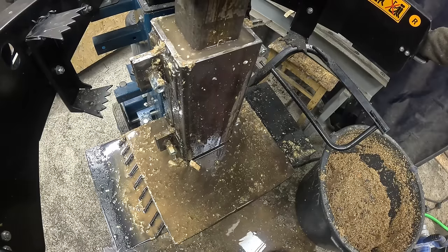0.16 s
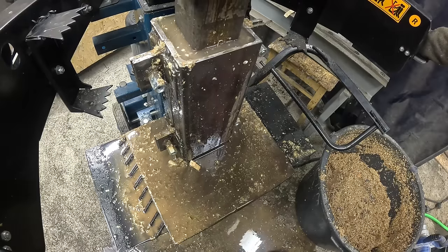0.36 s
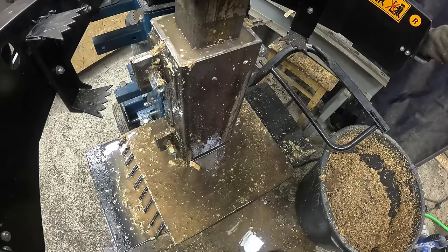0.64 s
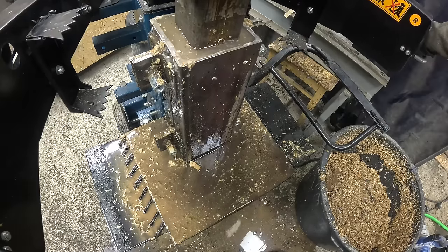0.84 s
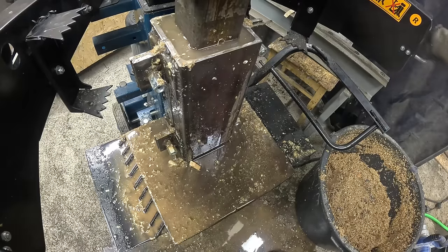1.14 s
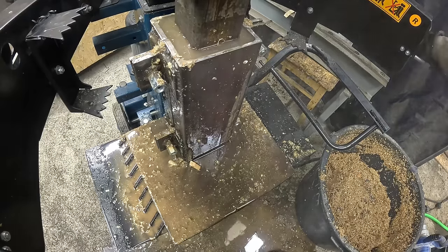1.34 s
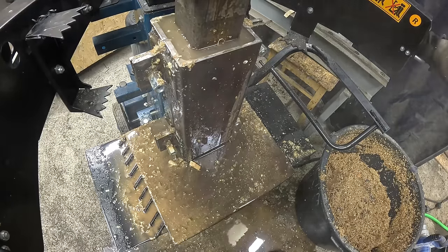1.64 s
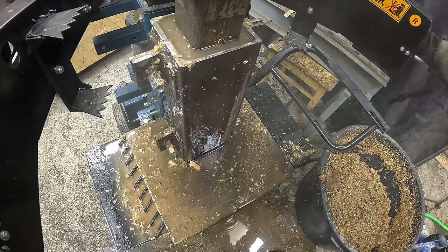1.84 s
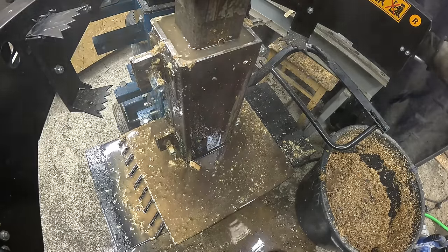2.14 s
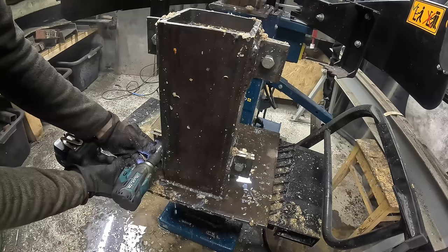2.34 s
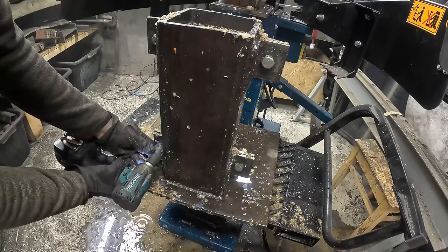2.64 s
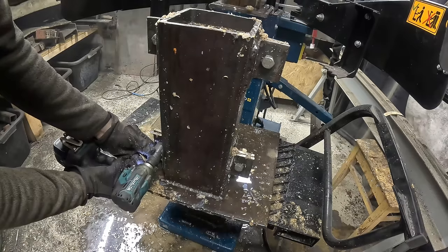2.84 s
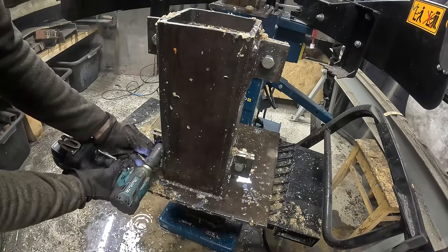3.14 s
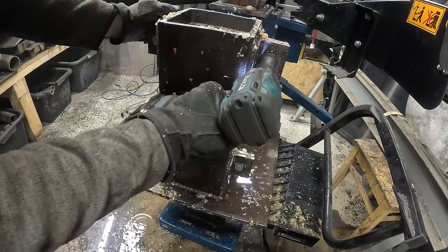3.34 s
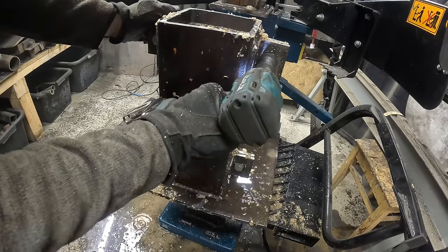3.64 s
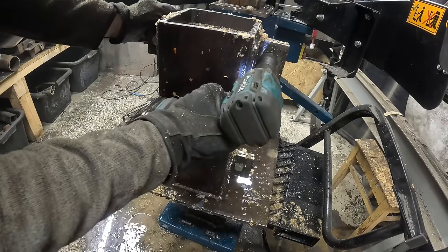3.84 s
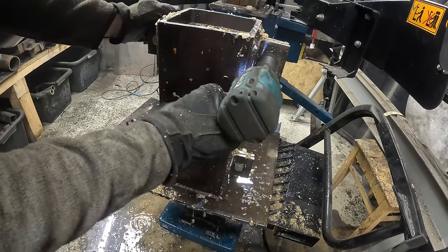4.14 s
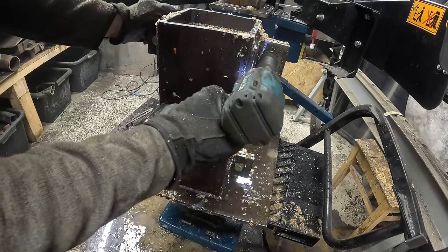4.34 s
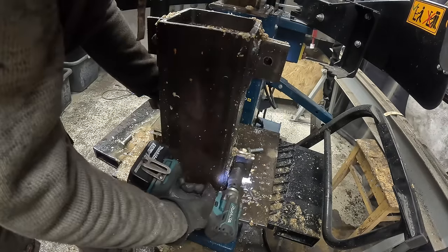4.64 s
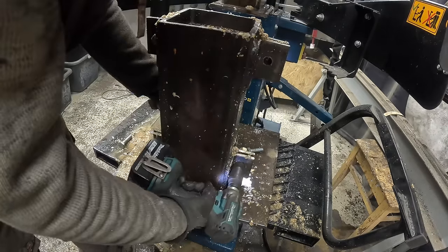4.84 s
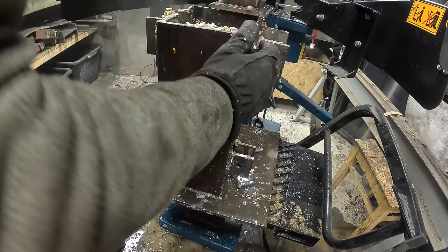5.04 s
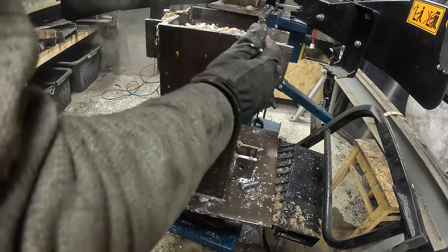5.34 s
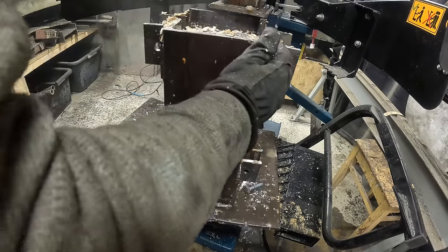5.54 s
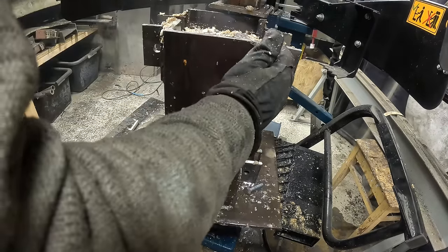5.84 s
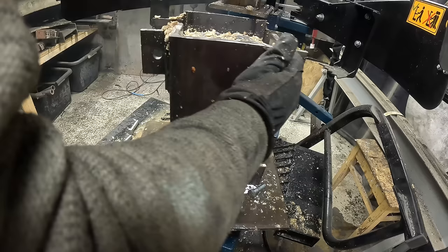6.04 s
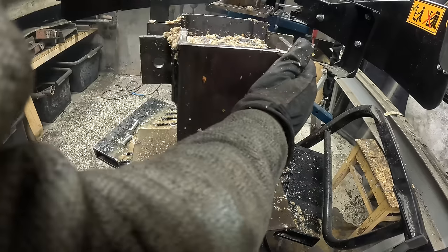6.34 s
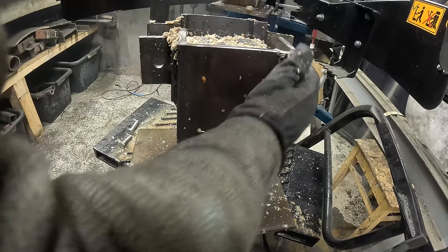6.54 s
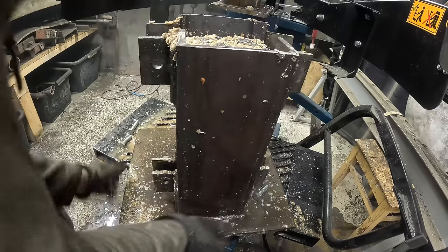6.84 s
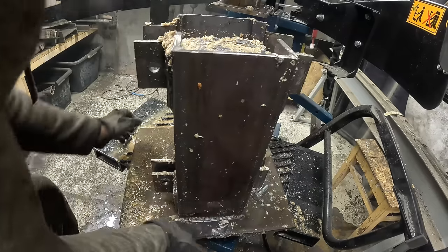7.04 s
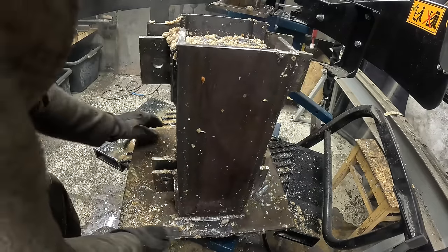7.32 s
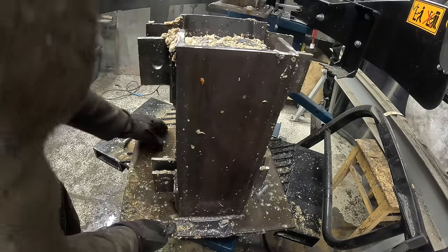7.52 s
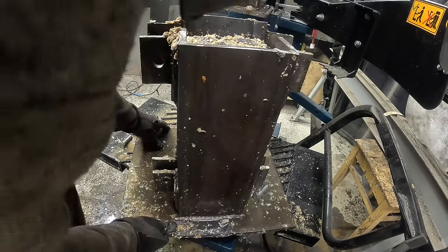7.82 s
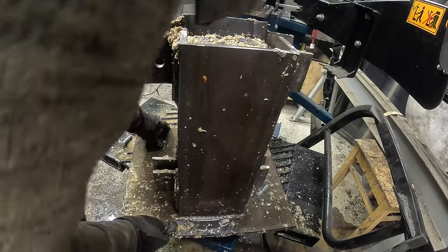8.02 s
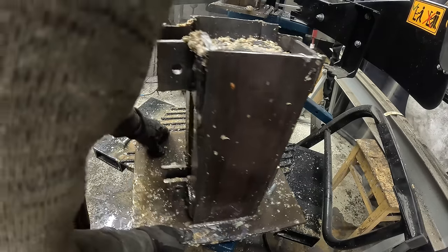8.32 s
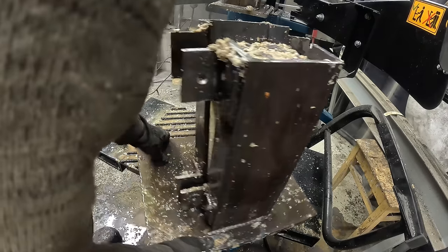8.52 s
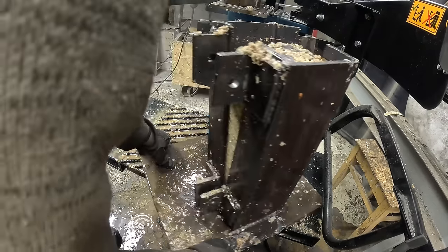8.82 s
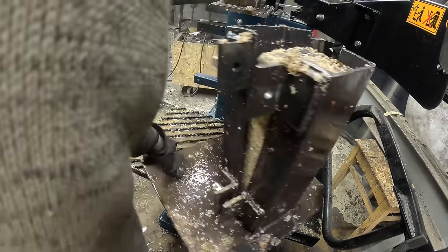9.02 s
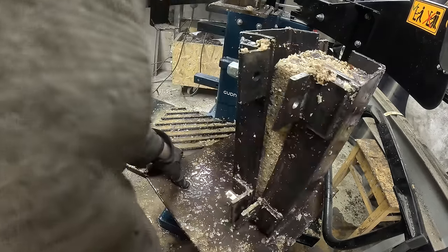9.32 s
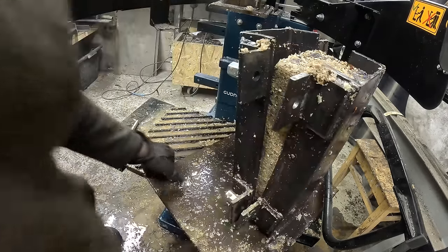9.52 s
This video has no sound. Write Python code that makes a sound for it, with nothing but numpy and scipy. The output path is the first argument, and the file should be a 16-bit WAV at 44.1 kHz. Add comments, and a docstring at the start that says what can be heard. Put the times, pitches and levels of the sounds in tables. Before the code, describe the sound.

Labouring hydraulic whine and oil hiss stop abruptly, then close impact wrench clatter in three bursts, loose bolt rattling, and a steel mould dragged open with clanks.

```python
"""In a workshop a hydraulic pump labours, runs free and stops; load slows its shaft orders and pulsing oil hiss.
A cordless impact wrench then undoes the bolts of a steel mould in three bursts, close to the microphone:
modal blows of its hammer over a motor whose whine follows the trigger. A loose bolt is rattled out by hand
and put down, and the mould is rocked open on a steel table: noise-burst knocks and dragging ring steel modes.
Sleeves rustle, arms bump the table, and a faint air noise lies underneath."""
import sys
import numpy as np
from scipy import signal
from scipy.fft import rfft, irfft
from scipy.io import wavfile
from scipy.ndimage import uniform_filter1d

SR = 44100
rng = np.random.default_rng(int(sys.argv[2]) if len(sys.argv) > 2 else 0)


def generate_wav(signal):
    """Clip the signal to [-1, 1] and save it as 16-bit WAV at the path in sys.argv[1]."""
    frames = np.transpose(np.atleast_2d(signal))
    scaled = np.clip(frames, -1, 1) * 32767
    pcm = np.round(scaled).astype(np.int16)
    wavfile.write(sys.argv[1], SR, pcm)


N = 426432
TIME = np.arange(N) / SR
IDLE_HZ, SLIP_HZ = 49.737, .57  # pump shaft running free; its slowing under full load
STRIKE_RISE_S = .0002  # onset of a hammer blow
WRENCH_END = 5.096  # s; the wrench and its room tail stop here

# bright modes of the bolt itself: [f/Hz, level/dB, t60/s]
BOLT_MODES = [(1690, 14.5, .08), (2370, -1.5, 0.09), (2990, -3.5, .1), (4100, 1, .14), (4210, -10.5, .16),
              (5060, -10, 0.12), (5480, -9, 0.16)]
# trigger pulls: [pressed t/s, full speed t/s, eased off t/s, braked t/s, loaded level/dB, free peak level/dB,
# fade/dB per s, gear whine relative level/dB, case whirr relative level/dB]
TRIGGER_PULLS = [(2.326, 3.018, 3.11, 3.235, -38.5, -32.5, 70, -13, -5),
                 (3.346, 4.19, 4.29, 4.448, -38.5, -29, 30, -4.5, -13),
                 (4.6, 4.799, 4.97, 5.092, -31.5, -30.5, 70, -16.5, -10)]


def gain_of(db):
    """Decibels to amplitude."""
    return 10 ** (np.asarray(db) / 20)


def evened(x):
    """Scales to rms 1."""
    return x / np.sqrt(np.mean(x ** 2) + 1e-20)


def read(points, hz):
    """Reads a spectrum on a log-frequency axis."""
    f, value = np.transpose(points)
    return np.interp(np.log(hz + 1), np.log(f + 1), value)


def curves(rows):
    """Every column of a table of times, sample by sample."""
    s, *columns = np.transpose(rows)
    return [np.interp(TIME, s, c) for c in columns]


def between(start, end):
    """A switch with 3 ms edges."""
    return np.clip(np.minimum(TIME - start, end - TIME) / .003, 0, 1)


def stroke(start, end, attack_s, release_db_per_s, sag_db_per_s=0):
    """Envelope of a movement: attack, a hold that may sag or grow, release."""
    t = np.maximum(TIME - start, 0)
    release_db = -abs(release_db_per_s) * np.maximum(TIME - end, 0)
    return np.minimum(t / attack_s, 1) * gain_of(-sag_db_per_s * t + release_db)


def add(mix, s, sound):
    """Mixes a sound in at s seconds."""
    part = mix[round(s * SR):][:len(sound)]
    part += sound[:len(part)]


def drift(rate_hz):
    """Slow random wander of rms 1, with a new target rate_hz times a second."""
    knots = rng.standard_normal(4000)
    return evened(np.interp(TIME * rate_hz, np.arange(len(knots)), knots))


def colour(x, *spectra, size=4096):
    """Causal minimum-phase filter whose gain is the sum of the spectra in dB."""
    hz = abs(np.fft.fftfreq(size, 1 / SR))
    db = np.maximum(sum(read(s, hz) for s in spectra), -100)
    log_gain = np.log(gain_of(db))
    taps = np.fft.ifft(np.exp(np.conj(signal.hilbert(log_gain)))).real
    return signal.oaconvolve(x, taps[:size // 2])[:len(x)]


def noise(spectrum):
    """Coloured noise of rms 1."""
    return evened(colour(rng.standard_normal(N), spectrum))


def band(hz, octaves, db):
    """A peak of db at hz, as a spectrum."""
    return [(hz / 2 ** octaves, 0), (hz, db), (hz * 2 ** octaves, 0)]


def cycle(turns, orders, db, size=8192):
    """A wave that repeats once a turn, with these orders at these rms levels."""
    bins = np.zeros(size // 2 + 1, complex)
    phases = np.exp(2j * np.pi * rng.random(len(orders)))
    bins[np.asarray(orders, int)] = gain_of(db) * phases
    wave = irfft(bins) * size / np.sqrt(2)
    return np.interp(turns % 1 * size, np.arange(size), wave, period=size)


def ringing(modes, pitch=1, spread_db=3, detune=.012):
    """Steel's answer to one click, of energy 1; chance weights and detunes the decaying modes."""
    t = np.arange(SR // 2) / SR
    hz, db, t60 = np.transpose(modes)[:, :, None]
    weight = gain_of(db + spread_db * rng.standard_normal(db.shape)) / np.sqrt(t60)
    hz = hz * pitch * (1 + detune * rng.standard_normal(hz.shape))
    decay = np.exp(-np.log(1000) * t / t60)
    ring = (weight * decay * np.cos(2 * np.pi * hz * t)).sum(0)
    return ring / np.linalg.norm(ring)


def workshop(x, left_db, wet_db, likeness, lag_s):
    """Direct sound and a tail that dies by band, at two close microphone ports."""
    # decay of the room: [f/Hz, t60/s]
    room_t60 = [(100, 0.43), (300, 0.47), (1000, 0.47), (2000, 0.48), (5000, 0.32), (12000, 0.17)]
    taps = rng.standard_normal((2, SR)) * (rng.random((2, SR)) < 4000 / SR) * (TIME[:SR] > .004)
    hz, t, z = signal.stft(taps, SR, nperseg=256)
    # how far the two tails differ by frequency
    unlike = read([(70, 0.68), (280, .08), (1000, 0.43), (2800, 1.2), (6500, 0.57), (12000, 0.85)], hz)
    same = np.clip(1 - (1 - likeness) * unlike, -1, 1)[:, None]
    z[1] = same * z[0] + np.sqrt(1 - same ** 2) * z[1]
    decay = gain_of(-60 * t / read(room_t60, hz)[:, None])
    tail = signal.istft(z * decay, SR, nperseg=256)[1]
    wet = signal.fftconvolve(x[None], tail / np.linalg.norm(tail[0]), axes=1)[:, :N]
    k = np.arange(-8, 9)
    late = np.convolve(x, np.sinc(k - lag_s * SR) * np.hanning(len(k)), "same")  # left is a little farther
    return (np.array([late, x]) + gain_of(wet_db) * wet) * gain_of([[left_db / 2], [-left_db / 2]])


def quiet_air(level_db=-64.0):
    """The faint steady noise of the place, as coloured noise."""
    return gain_of(level_db) * noise([(30, -14.5), (150, -6.0), (500, -11.5), (1100, -8.5), (1700, -6.5),
                                      (4000, -29.5), (9000, -23.0), (12000, -44.5)])


def pump_state(turns, strong, oil, oil_db, buzz_db, whine_db, pulsing, count=260):
    """Gear teeth give strong shaft orders over a fine buzz; the oil hiss pulses with the shaft."""
    orders, db = np.transpose(strong)
    weak = np.setdiff1d(np.arange(3, count), orders)
    weak_db = read(oil, weak * IDLE_HZ) + 4 * rng.standard_normal(len(weak))
    buzz = evened(cycle(turns, weak, weak_db))
    # three groups of orders waver separately
    whine = sum(cycle(turns, orders[k::3], db[k::3]) * gain_of(1.2 * drift(22)) for k in range(3))
    pulse = 1 + pulsing * np.cos(2 * np.pi * turns)
    hiss = noise(oil) * pulse * gain_of(0.58 * drift(24.63))
    return np.array([gain_of(oil_db) * hiss + gain_of(buzz_db) * buzz, gain_of(whine_db) * whine])


def pump(end=2.321, drone_db=-29.5, drone_power=10):
    """Load slows the shaft and makes the frame drone at twice its speed. Gives rush and tones."""
    # pump drive: [t/s, load 0-1, relative level/dB]
    drive = [(0, 1, 0), (.38, 1, 0), (.48, .92, -2.5), (.57, .7, -2.5), (.63, .35, -2), (.69, 0, -1.5),
             (.85, 0, -1.5), (1.2, 0, -.5), (1.68, 0, .5), (2.32, 0, 0)]
    # strong shaft orders, under load and running free: [multiple of shaft speed, relative level/dB]
    loaded_orders = [(1, -39), (10, -30), (12, -22.5), (13, -35), (15, -37), (22, -37), (24, -37),
                     (28, -43), (29, -43), (36, -41), (38, -28.5), (47, -42), (48, -44), (59, -41),
                     (61, -44), (84, -47), (106, -50), (109, -48), (120, -47), (123, -50), (130, -49),
                     (133, -48), (145, -49), (156, -49), (159, -43), (168, -43), (169, -45), (227, -58),
                     (229, -57), (260, -65)]
    free_orders = [(1, -40), (14, -48), (23, -45), (27, -44), (30, -43), (37, -39), (38, -45), (47, -46),
                   (49, -46), (60, -39), (82, -45), (83, -42), (99, -47), (100, -45), (108, -43),
                   (111, -46), (112, -43), (122, -47), (132, -44), (133, -39), (136, -49), (137, -50),
                   (142, -50), (143, -48), (146, -49), (152, -44), (156, -48), (157, -39), (158, -42),
                   (167, -51), (179, -51), (184, -55), (227, -55), (256, -63)]
    # oil rushing through the valve, under load and running free: [f/Hz, relative level/dB per Hz]
    loaded_oil = [(25, -14.5), (70, -3), (110, 6), (175, 1), (260, 4), (340, -5), (430, 6), (540, 10),
                  (800, -4), (1250, 1), (2050, -5.5), (2900, -5.5), (4000, -17), (6500, -9.5), (8500, -13),
                  (10500, -27), (15500, -33)]
    free_oil = [(15, -38), (25, -11), (53, -29.5), (75, -6.5), (178, -10), (482, -4.5), (848, -6),
                (1170, -1.5), (1750, -6.5), (1900, -6.5), (2060, -8), (3000, -3), (4500, -7), (7700, -8),
                (10000, -23.5), (12400, -22.5), (15500, -52)]
    load, db = curves(drive)
    load = np.clip(load, 0, 1)
    shaft_hz = IDLE_HZ - SLIP_HZ * np.sin(load * np.pi / 2)
    turns = np.cumsum(shaft_hz * (1 + .00012 * drift(12))) / SR
    loaded = pump_state(turns, loaded_orders, loaded_oil,
                        oil_db=-27.2, buzz_db=-32, whine_db=-1.5, pulsing=.35)
    free = pump_state(turns, free_orders, free_oil,
                      oil_db=-28.3, buzz_db=-33.5, whine_db=0, pulsing=0.22)
    rush, tones = load * loaded + np.sqrt(1 - load) * free
    drone = load ** drone_power * cycle(turns, [2], [drone_db])
    return np.array([rush, tones + drone]) * gain_of(db) * between(-1, end)


def valve(attack_s=0.025, release_db_per_s=160):
    """Short rushes of oil, as banded noise, while the pressure drains."""
    # oil surging through the valve as the lever is let go: [from t/s, to t/s, centre f/Hz, level/dB]
    surges = [(0.51, 0.658, 1350, -32), (0.606, 0.755, 330, -40.5), (0.727, 0.753, 1750, -32)]
    return sum(gain_of(db) * noise(band(hz, 4.4, 41)) * stroke(start, end, attack_s, release_db_per_s)
               for start, end, hz, db in surges)


def cloth(grains_per_s=2500, attack_s=0.012, release_db_per_s=167):
    """With each movement fabric and sawdust rustle in fine grains; hands bump softly on the table."""
    # movements of the arms: [from t/s, to t/s, sleeve rustle level/dB, soft bumping level/dB]
    moves = [(5.079, 5.27, -61, -68.5), (5.595, 6.553, -85, -53), (6.65, 6.835, -62.5, -57),
             (6.87, 6.96, -54, -57), (6.987, 7.024, -69, -49.5), (7.047, 7.19, -76, -53),
             (7.195, 7.244, -58, -64), (7.304, 7.417, -58.5, -57), (7.49, 7.518, -61.5, -69),
             (7.728, 7.755, -57, -48.5), (7.8, 7.876, -70, -52.5), (7.99, 8.01, -61, -73),
             (8.138, 9.1, -63.5, -41), (9.146, 9.314, -59, -51), (9.422, 9.533, -55.5, -61),
             (9.578, 9.67, -53.5, -67)]
    # rustle of the sleeves: [f/Hz, relative level/dB per Hz]
    rustle_colour = [(180, -46), (300, -5.5), (639, -2.5), (750, -1), (1550, 5.5), (1850, -2), (5000, -8),
                     (8500, -11), (10500, -21.5), (14000, -46)]
    # a hand or arm bumping the table: [f/Hz, relative level/dB per Hz]
    bump_colour = [(25, 1.5), (55, -1), (85, -3), (110, -1.5), (150, 0), (210, -3), (320, -10.5),
                   (600, -12), (1500, -35.5), (3000, -60)]
    grains = evened(rng.laplace(size=N) * (rng.random(N) < grains_per_s / SR))
    rustle = evened(colour(1.3 * grains + rng.standard_normal(N), rustle_colour))
    rustle = rustle * gain_of(3 * drift(70) + 2 * drift(18))
    bumps = noise(bump_colour)
    out = np.zeros(N)
    for start, end, rustle_db, bump_db in moves:
        movement = stroke(start, end, attack_s, release_db_per_s)
        out += movement * (gain_of(rustle_db) * rustle + gain_of(bump_db) * bumps)
    return out


def knock(contact, t60, rise_s, db, treble_db, bass_db, hollow_db, ring_hz,
          rebound_s=.015, rebound_db=-11, push_db=-6, place_peak_db=4, contact_spread=0.02):
    """A firm push, a short chatter of contacts and a rebound; each place struck has its own resonance."""
    t = np.arange(8000) / SR
    after = np.maximum(t - rebound_s * rng.uniform(0.62, 1.3), 0)
    first, rebound = (gain_of(-60 * u / t60) * (1 - np.exp(-u / rise_s)) for u in (t, after))
    chatter = rng.standard_normal(len(t)) * (first + gain_of(rebound_db) * rebound)
    force = chatter / np.linalg.norm(chatter)
    push = np.hanning(24)
    add(force, rise_s, gain_of(push_db) * push / push.sum())
    tilt = [(330, bass_db), (480, hollow_db), (620, hollow_db), (900, 0), (1700, 0), (3500, treble_db)]
    # the pitch varies with the place struck
    place = np.array(contact) * [np.exp(contact_spread * rng.standard_normal()), 1]
    sound = colour(force, place, tilt, band(ring_hz, 0.15, place_peak_db))
    return gain_of(db) * sound / np.sqrt(np.mean(sound[:700] ** 2))


def set_down(level_db=-9, contact_t60=0.065, rise_s=0.00206):
    """The loose bolt touches the table, lands and tips over, each contact a knock."""
    # contacts of the bolt: [t/s, relative level/dB, treble/dB, bass/dB, hollow/dB, ring f/Hz]
    contacts = [(7.344, -27, -8, 1.5, 13, 1100), (7.378, -37, 1, 16, 8, 950),
                (7.626, -10, -2, -8.5, 7, 1400), (7.68, -15.5, -12, 1.5, 13, 960)]
    # bolt meeting the table: [f/Hz, relative level/dB per Hz]
    table_top = [(60, -7), (178, -10), (330, 4.5), (450, -13.5), (720, -18), (940, 3.5), (1350, -4),
                 (1650, -9.5), (2500, -24), (4200, -30), (5200, -40), (12000, -58)]
    out = np.zeros(N)
    for s, *blow in contacts:
        add(out, s, gain_of(level_db) * knock(table_top, contact_t60, rise_s, *blow))
    return out


def steel(knocks, drags, contact, knock_db, drag_db, ring_db, chink_db, slips_per_s, rise_s, contact_t60,
          clump_db, drag_attack_s=0.022, drag_sag_db_per_s=-0.5, drag_release_db_per_s=238,
          groan_waver=0.0305, groan_flutter_db=5.5):
    """Knocks are short clusters of contacts, dragging a clumped stream of slips that groans; both ring the mould."""
    # modes of the mould on the table: [f/Hz, relative level/dB, t60/s]
    mould_modes = [(107.8, -9, 1), (133, -12.5, 0.9), (202.4, -4, .4), (234.4, 1, 0.35), (275.7, 0, 0.7),
                   (302.5, -2.5, .4), (503, -6.5, 0.64), (516, -15, 0.27), (584, -4.5, 0.86),
                   (808, -1.5, 0.29), (865, -3.5, .25), (926, -0.5, 0.25), (1060, -8, 0.27),
                   (1164, -3.5, 0.2), (1270, -2.5, 0.15), (1603, 2.5, 0.22), (1680, -3.5, 0.18),
                   (2090, 5.5, .2), (2604, 2, 0.13), (2840, 3, 0.14), (3160, 9, 0.19), (3440, 4, 0.18),
                   (3940, 14.5, 0.13), (4110, 6, .2), (4870, 0, .2), (5480, 5.5, .2), (7060, 8, .15)]
    # the mould's modes sink as its halves part: [t/s, pitch factor]
    parting = [(8.6, 1), (9.1, 0.96)]
    out = np.zeros(N)
    for s, db, treble_db, *timbre in knocks:
        hit = gain_of(knock_db) * knock(contact, contact_t60, rise_s, db, treble_db, *timbre)
        add(out, s, hit)
        pitch = np.interp(s, *np.transpose(parting))
        add(out, s, gain_of(ring_db) * signal.fftconvolve(hit, ringing(mould_modes, pitch)))
        add(out, s, gain_of(chink_db + db + treble_db) * ringing(BOLT_MODES, detune=.004))
    slips = rng.standard_normal(N) * (rng.random(N) < slips_per_s / SR) * gain_of(clump_db * drift(60))
    slips = evened(colour(slips, contact))
    slips = slips + gain_of(ring_db) * signal.oaconvolve(slips, ringing(mould_modes))[:N]
    # the groan of sticking steel wavers with the hand's pressure
    clock = np.cumsum(1 + groan_waver * drift(70)) / SR
    flutter = gain_of(groan_flutter_db * drift(40))
    for start, end, db, hz, groan_db in drags:
        pressure = stroke(start, end, drag_attack_s, drag_release_db_per_s, drag_sag_db_per_s)
        groan = flutter * np.sin(2 * np.pi * hz * clock)
        out += pressure * (gain_of(db + drag_db) * slips + gain_of(groan_db) * groan)
    return out


def mould_opening():
    """The mould knocks on the table as it is gripped and rocked, slides open and swings out."""
    # knocks on the table: [t/s, relative level/dB, treble/dB, bass/dB, hollow/dB, ring f/Hz]
    table_knocks = [(6.948, -29, 11, 16.5, 6.5, 241), (7.057, -39, 3, 4, 14, 510),
                    (7.127, -38, 3, -1, 2, 484), (7.303, -46, 10, -6, -6, 900),
                    (8.143, -11.5, -9, -4, -0.5, 566), (8.192, -4, -13, -4.5, -10.5, 1065),
                    (8.291, -13.5, 3.5, -4.5, -12, 1240), (8.356, -3.5, -6, -5, -11.5, 930),
                    (8.37, -7, -3.5, -6, -6, 1160), (8.407, -9, -2, 0, -13, 236),
                    (8.48, -12.5, 10, -10, -5.5, 1500), (8.496, -8, 3, -16, -2, 1200),
                    (8.564, -4, -6, -5, -13, 1270), (8.665, -3, -3.5, -0.5, -3, 930),
                    (8.82, -4.5, -5, 9.5, 6, 270), (8.836, -10, -10, -7, 7, 920),
                    (8.884, -15, -2, -19, 0, 234), (8.924, -4.5, -3, -5.5, -1, 880),
                    (9.049, -9.5, 8, -4, -1.5, 231), (9.107, -3.5, -7.5, 3, 2.5, 560),
                    (9.19, -17.5, 6, 12, 1, 257), (9.592, -34.5, 24.5, 13, -2, 219)]
    # steel dragging on steel: [from t/s, to t/s, relative level/dB, groan f/Hz, groan level/dB]
    slides = [(8.109, 8.273, -30, 283, -47.5), (8.285, 8.586, -23.5, 580, -33.5),
              (8.608, 9.014, -29.5, 936, -45), (9.044, 9.287, -29, 542.5, -36)]
    # contact with the mould open: [f/Hz, relative level/dB per Hz]
    open_contact = [(24, -64), (40, -15), (107, -2), (166, -4.5), (234, 0.5), (421, -10.5), (565, 2.5),
                    (670, -14.5), (945, -2.5), (1400, -15.5), (1620, -15), (2580, -25), (4010, -32),
                    (9010, -49), (14000, -91)]
    return steel(table_knocks, slides, open_contact, knock_db=-12.0, drag_db=-5.5, ring_db=-13.5, chink_db=-15,
                 slips_per_s=1800, rise_s=0.00213, contact_t60=0.05, clump_db=3)


def bolt_rattle():
    """The loose bolt knocks in its hole as it is gripped, then drawn out in two pulls."""
    # knocks in the hole: [t/s, relative level/dB, treble/dB, bass/dB, hollow/dB, ring f/Hz]
    hole_knocks = [(5.322, -4, -2, -8, 4, 940), (5.36, -3.5, 0.5, 3, -4, 950), (5.378, 0, -3, 4, 7, 1050),
                   (5.391, -6, -11, -1, -5.5, 820), (5.411, -5.5, 6.5, -2, 1, 1090),
                   (5.435, -1, 1.5, 2.5, 1, 1013), (5.461, -0.5, 3, 1.5, 4.5, 1190),
                   (5.511, -5.5, -8, -3, 4.5, 1130), (5.529, -2.5, -5.5, 1.5, 3, 494),
                   (5.573, -5.5, -19, -5.5, -5, 960), (5.602, -22, -12, 10, -7, 1100),
                   (5.629, -4.5, -2, 6, 13.5, 522), (5.916, -8, -2.5, -4.5, 0, 826),
                   (5.971, -16, 4, 4, -1, 510), (5.997, -5.5, 1.5, 2.5, 6.5, 1120),
                   (6.021, -3, -0.5, -7, -8, 1210), (6.057, -0.5, -5.5, 3, 5, 517),
                   (6.131, -1.5, 0, 2, -1, 970), (6.162, -3, -18, -1, -1, 960),
                   (6.198, -2, 3.5, -3, 0, 1570), (6.225, -6.5, -1, 8, -4, 907),
                   (6.288, -3.5, 0.5, 0, -2, 595), (6.323, -7.5, -7, -1, -22, 1270),
                   (6.352, -17, -1, 0, 11, 930)]
    # steel dragging on steel: [from t/s, to t/s, relative level/dB, groan f/Hz, groan level/dB]
    bolt_drags = [(5.294, 5.325, -32.5, 1000, -53), (5.332, 5.626, -27.5, 492, -31.5),
                  (5.882, 5.915, -36.5, 997, -50), (5.914, 6.332, -28, 560, -37)]
    # contact with the mould shut: [f/Hz, relative level/dB per Hz]
    shut_contact = [(24, -20.5), (40, -6), (76, -16), (120, 1), (174, -15), (277, -8), (431, -14.5),
                    (510, -1.5), (687, -19.5), (776, -8.5), (1090, -5), (2400, -25), (4010, -33.5),
                    (7050, -50.5), (14000, -79)]
    return steel(hole_knocks, bolt_drags, shut_contact, knock_db=-15.5, drag_db=-5, ring_db=-15, chink_db=-12.0,
                 slips_per_s=500, rise_s=0.001757, contact_t60=0.055, clump_db=4.0)


def rasp(level_db=-1, grains_per_s=700, clump_db=4, ring_db=-4, attack_s=.004, release_db_per_s=450):
    """Grit cracks between the steel faces in clumped grains that ring the bright modes."""
    # steel edges biting through grit: [from t/s, to t/s, relative level/dB]
    bites = [(5.358, 5.45, -44), (5.459, 5.473, -43), (5.489, 5.59, -44), (6.0, 6.066, -49),
             (6.145, 6.205, -36), (8.293, 8.342, -39), (8.366, 8.42, -47), (8.48, 8.518, -37),
             (8.565, 8.63, -57), (8.645, 8.695, -40), (8.725, 8.85, -48.5), (8.93, 9.006, -35),
             (9.047, 9.066, -40), (9.15, 9.2, -42), (9.278, 9.297, -47)]
    # cracking grit: [f/Hz, relative level/dB per Hz]
    grit_colour = [(500, -14), (1400, 6.5), (2050, 15), (2500, 0), (3150, -0.5), (3950, -0.5), (4600, -12),
                   (5400, -9), (6300, -26.5), (7100, -12.5), (9500, -14.5), (11500, -42.5), (16000, -52)]
    grains = rng.laplace(size=N) * (rng.random(N) < grains_per_s / SR) * gain_of(clump_db * drift(120))
    ring = signal.oaconvolve(grains, ringing(BOLT_MODES))[:N]
    grit = evened(evened(colour(grains, grit_colour)) + gain_of(ring_db) * evened(ring))
    return grit * sum(gain_of(db + level_db) * stroke(start, end, attack_s, release_db_per_s)
                      for start, end, db in bites)


def creep(ticks_per_s=95, tick_s=.003):
    """At a crawl the drive feeds the motor in short pushes, each a tick in the gear case."""
    # the trigger barely held: [from t/s, to t/s, level/dB]
    creeps = [(3.252, 3.335, -46.5), (4.51, 4.609, -51.5)]
    # one tick: [f/Hz, relative level/dB per Hz]
    tick_colour = [(500, -20), (2500, -2.5), (3400, 7.5), (4500, -10), (7000, -9), (8000, 9), (9500, -14),
                   (11500, -31)]
    since = np.cumsum(ticks_per_s * (1 + .15 * drift(60))) / SR % 1 / ticks_per_s  # s since the last push
    ticks = evened(noise(tick_colour) * np.exp(-since / tick_s))
    return ticks * sum(gain_of(db) * between(start, end) for start, end, db in creeps)


def whistles(waver=.006, flutter_db=5):
    """Thin, unsteady sine tones from the wrench and the bolt."""
    # motor drive at a crawl, and the freed bolt singing: [from t/s, to t/s, f/Hz, level/dB, fall/dB per s]
    thin_tones = [(3.255, 3.34, 8000, -49, 20), (4.46, 4.64, 8000, -52, 0), (3.28, 3.35, 3330, -47, 0),
                  (5.018, 5.09, 11730, -34, 330), (5.018, 5.09, 12344, -35, 380)]
    out = np.zeros(N)
    clock = np.cumsum(1 + waver * drift(400)) / SR
    for start, end, hz, db, fall in thin_tones:
        level = gain_of(db - abs(fall) * np.maximum(TIME - start, 0))
        out += between(start, end) * level * np.sin(2 * np.pi * hz * clock)
    return np.sqrt(2) * out * gain_of(flutter_db * drift(230))


def trigger(crawl_hz=170.6, start_hz=214.6, top_hz=417.4, eased_hz=269.3, coast_s=.07,
            crawl_db=-45, fan_db=-53, swell_db_per_s=43, hammering_whine_db=-11.5, coast_whine_db_per_s=15):
    """Each pull runs the rotor up, louder once free, then it coasts; between pulls it crawls.
    Gives rotor Hz, dB, whine dB, air dB, whirr dB."""
    # the burst on each bolt: [from t/s, to t/s, gust on the microphone at first level/dB, at last level/dB]
    bursts = [(2.362, 2.935, -51, -52.5), (3.335, 4.09, -39.5, -46.5), (4.63, 4.878, -31.5, -33)]
    crawl = crawl_hz, crawl_db, -16, fan_db, -14
    hz, db, whine_db, air_db, whirr_db = (np.full(N, float(v)) for v in crawl)
    for pressed, full, eased, braked, loaded_db, free_db, fade, whine, whirr in TRIGGER_PULLS:
        on = (TIME >= pressed) & (TIME < braked)
        t = TIME[on]
        coasting = np.maximum(t - eased, 0)
        sinking = (top_hz - eased_hz) * (1 - np.exp(-coasting / coast_s))
        hz[on] = np.interp(t, (pressed, full), (start_hz, top_hz)) - sinking
        swell_db = free_db - swell_db_per_s * np.maximum(eased - t, 0)
        db[on] = np.maximum(swell_db, loaded_db) - fade * coasting
        whine_db[on] = whine + coast_whine_db_per_s * coasting  # stands out as the gears run down
        whirr_db[on] = whirr
    for start, end, first_air, last_air in bursts:
        on = (TIME >= start) & (TIME < end)
        whine_db[on] += hammering_whine_db
        air_db[on] = np.interp(TIME[on], (start, end), (first_air, last_air))
    return uniform_filter1d(np.array([hz, db, whine_db, air_db, whirr_db]), size=600)


def tooth_whine(hz, jitter=.012, flutter_db=4):
    """Each mesh of teeth sings at its multiple of the rotor speed, made rough by the play in the gears."""
    # gear teeth and rotor slots: [multiple of the rotor speed, relative level/dB]
    meshes = [(2.25, -11), (2.9, -15), (4.1, -11), (5.1, -11), (6.33, -9), (9.67, -8), (10, -9), (14.5, -8),
              (15.05, -9), (18.4, -19), (20, -15)]
    out = np.zeros(N)
    for multiple, db in meshes:
        level = gain_of(db + flutter_db * drift(260))
        turns = np.cumsum(multiple * hz * (1 + jitter * drift(600))) / SR
        out += level * np.sin(2 * np.pi * turns)
    return np.sqrt(2) * out


def wrench_motor(gears_db=-2.0, buzz_db=-5, housing_hz=930, housing_db=-13, count=24):
    """Rotor buzz and tooth whine follow the trigger over gear noise; the case whirrs, the housing hums, the fan blows."""
    # gear noise: [f/Hz, relative level/dB per Hz]
    gear_colour = [(59, -52.5), (100, -15), (172, -18), (274, 1.5), (304, -15), (482, -4), (660, -6.5),
                   (867, 1), (1400, -5.5), (2130, -1), (4260, -10.5), (5960, -11), (8880, -16.5),
                   (15000, -42)]
    # resonances of the gear case: [f/Hz, relative level/dB]
    case_colour = [(1500, -45.5), (2350, -9.5), (2620, 3.5), (2900, -8), (3120, -5.5), (3500, -5),
                   (4400, -18.5), (7000, -26), (7850, -8.5), (9000, -34)]
    # a crawling gearbox sounds duller: [f/Hz, gain/dB]
    crawl_colour = [(1500, 2), (3500, -1.5), (6000, -1), (12000, -15.5)]
    # air on the microphone: [f/Hz, relative level/dB per Hz]
    air_colour = [(15, -4.5), (35, -8), (110, -3), (200, -1), (400, -13), (1000, -41), (3000, -74.5)]
    hz, db, whine_db, air_db, whirr_db = trigger()
    turns = np.cumsum(hz * (1 + .012 * drift(500))) / SR
    orders = np.arange(4, count)
    buzz = evened(colour(cycle(turns, orders, 3 * rng.standard_normal(len(orders))), gear_colour))
    whine = tooth_whine(hz)
    gears = noise(gear_colour) * gain_of(2 * drift(250))
    housing = noise([(housing_hz * .6, -70), (housing_hz * .96, -14), (housing_hz, 0),
                     (housing_hz * 1.04, -14), (housing_hz * 1.6, -70)])
    motor = gain_of(gears_db) * gears + gain_of(buzz_db) * buzz
    motor += gain_of(whine_db) * whine + gain_of(housing_db) * housing
    motor += gain_of(whirr_db) * evened(colour(buzz + gears / 2, case_colour))
    driven = sum(between(pressed, braked) for pressed, _, _, braked, *_ in TRIGGER_PULLS)
    motor = driven * motor + (1 - driven) * colour(motor, crawl_colour)
    running = between(TRIGGER_PULLS[0][0], TRIGGER_PULLS[-1][3])
    return (gain_of(db) * motor + gain_of(air_db) * noise(air_colour)) * running


def hammer(level_db=-1, strike_db=12, strike_t60=0.0022, anvil_db=-7, crack_t60=0.014, ring_t60=.11, ring_db=-9,
           peak_db=7, puff_db=7, puff_s=0.00078, recoil_s=.0055, recoil_db=-11.5):
    """Each blow strikes and rings the anvil, recoils, rattles briefly in the mould and pushes air at the microphone."""
    # blows, quickening as each bolt gives:
    # [t/s, relative level/dB, ring f/Hz, body below 2.5 kHz/dB, air puff relative level/dB]
    blows = [(2.3625, -19.5, 5800, 2, -37), (2.4207, -18.5, 3100, 6, -39.5), (2.4717, -18, 2950, 0, -36.5),
             (2.5202, -18.5, 2670, 4.5, -34), (2.565, -19, 3070, -0.5, -34.5), (2.611, -19, 2640, 2.5, -39),
             (2.653, -18.5, 2860, 2.5, -20), (2.6932, -19.5, 5860, 4, -21.5), (2.731, -19, 5670, 7, -43),
             (2.765, -18.5, 7000, 4.5, -22), (2.7985, -18.5, 6050, 6, -27), (2.83, -17.5, 2800, 5, -24),
             (2.8612, -18.5, 2570, 7, -23), (2.8942, -19, 3340, 9, -37.5), (2.931, -17, 5930, 4, -37),
             (3.363, -13, 4500, 4.5, -22.5), (3.426, -16, 1830, 0.5, -18.5),
             (3.485, -17.5, 2300, 1.5, -21.5), (3.5423, -17, 3360, 3.5, -26.5),
             (3.5956, -16.5, 4400, -1.5, -23), (3.649, -18, 4450, 4, -26.5), (3.6992, -18, 5340, 2.5, -22),
             (3.7498, -19, 3460, 3.5, -31), (3.7965, -19.5, 5600, -5, -23.5), (3.8383, -20, 4660, 4, -20.5),
             (3.8757, -20.5, 4850, -7.5, -31), (3.9087, -22.5, 4360, -4, -22),
             (3.9376, -24.5, 4800, -5.5, -32.5), (3.9656, -21.5, 5560, 0, -22.5),
             (3.9898, -20.5, 5600, 0, -21), (4.0099, -20, 3560, 1.5, -21), (4.03, -19, 6660, 4.5, -29.5),
             (4.0513, -18.5, 6140, 3, -22.5), (4.078, -20.5, 3490, 7, -32.5), (4.64, -12, 3400, 7, -38.5),
             (4.6839, -16, 3670, 10, -31), (4.72, -15, 3980, 5, -20), (4.7484, -15, 3360, 5.5, -29),
             (4.7672, -17, 1725, 3, -19.5), (4.79, -17, 7700, 9.5, -30.5), (4.8102, -16.5, 7140, 10, -30),
             (4.8328, -16.5, 7670, 5.5, -18.5), (4.8706, -17.5, 7000, -1, -23)]
    # single clacks of the wrench and socket, some of them rebounds of the first hammer blows:
    # [t/s, relative level/dB, ring f/Hz, body/dB, ring of the mould/dB]
    single_clacks = [(2.371, -18.5, 3060, 6, -20), (3.324, -22.5, 3200, 16.5, 21),
                     (3.352, -23.5, 2600, 8.5, 3.5), (3.373, -22, 4440, 5.5, -4.5),
                     (3.435, -21, 4500, 2, 6.5), (4.451, -26, 1930, 19.5, 2), (4.52, -38, 3360, -0.5, -11),
                     (4.603, -24, 1080, 17, -2), (4.632, -24.5, 1820, 8.5, -7.5), (4.84, -28, 6560, 8, -8),
                     (5.017, -17.5, 2760, 7.5, -2)]
    # crack of steel on steel: [f/Hz, relative level/dB per Hz]
    crack_colour = [(180, -25.5), (300, -11), (450, -7), (656, -6), (915, 1.5), (1030, -12), (1230, 1),
                    (1460, -1), (2030, 3.5), (3030, 4), (5080, 3), (7570, 2.5), (12100, -13),
                    (16000, -38.5)]
    # modes of the anvil and socket: [f/Hz, relative level/dB, t60/s]
    anvil_modes = [(1111, -11.5, 0.057), (2080, -11.5, 0.064), (3027, -8.5, 0.047), (3556, -10, 0.023),
                   (4240, -3, 0.0047), (5370, -7, 0.032), (6400, 5, 0.012), (7750, -13, 0.023),
                   (9000, -2, 0.024)]
    out, t = np.zeros(N), np.arange(6000) / SR
    onset = 1 - np.exp(-t / STRIKE_RISE_S)
    clacks = [(s, db, hz, body, -np.inf, tail_db) for s, db, hz, body, tail_db in single_clacks]  # no puff
    for s, db, hz, body, air_db, tail_db in [(*row, ring_db) for row in blows] + clacks:
        shape = [(1300, body), (3000, 0)], band(hz, .4, peak_db)
        # the hammer slaps the anvil again as it slips past
        late = t - recoil_s * rng.uniform(0.71, 1.5)
        strikes = gain_of(-60 * t / strike_t60) + (late > 0) * gain_of(recoil_db - 60 * abs(late) / strike_t60)
        crack_decay = gain_of(-60 * t / (crack_t60 * rng.uniform(0.95, 1.8)))
        tail = gain_of(tail_db - 60 * t / ring_t60)
        envelope = gain_of(strike_db) * strikes + crack_decay + tail
        crack = colour(envelope * onset * rng.standard_normal(len(t)), crack_colour, *shape)
        # the socket sits a little differently at every blow
        modes = np.zeros(len(t))
        for f, mode_db, t60 in anvil_modes:
            decay = gain_of(mode_db + 4 * rng.standard_normal() - 60 * t / t60)
            mode_hz = f * (1 + .08 * rng.standard_normal())
            modes += decay * np.sin(2 * np.pi * (mode_hz * t + rng.random()))
        anvil = colour(modes * onset, *shape, [(9000, 2), (11000, -25.0), (16000, -38.5)])
        blow = crack / np.std(crack[:350]) + gain_of(anvil_db) * anvil / np.std(anvil[:350])
        add(out, s, gain_of(db + level_db) * blow)
        u = t / puff_s
        puff = rng.choice([-1, 1]) * u ** 2 * np.exp(-u) * 2
        add(out, s + 0.0023, gain_of(air_db + puff_db) * puff)
    return out


def scene():
    """The pump, the handwork and the wrench in a quiet workshop, each group at its own place."""
    rush, tones = pump()
    pump_tones = workshop(tones, left_db=1.2, wet_db=-17, likeness=-.5, lag_s=.000005)
    oil = workshop(rush + valve(), left_db=1.0, wet_db=-5.5, likeness=-0.12, lag_s=.000005)
    table = workshop(mould_opening() + set_down() + cloth() + quiet_air(),
                     left_db=-0.3, wet_db=-9.5, likeness=0.17, lag_s=.000022)
    loose_bolt = workshop(bolt_rattle() + rasp(), left_db=-0.5, wet_db=-8.5, likeness=0.44, lag_s=.000024)
    wrench = workshop(hammer() + wrench_motor() + whistles() + creep(),
                      left_db=-2.0, wet_db=-11.5, likeness=0, lag_s=.000014)
    return pump_tones + oil + table + loose_bolt + wrench * between(-1, WRENCH_END)


def record(dry, edge_hz=16300):
    """The right port is duller; peaks stop at full scale; then the band limit."""
    # tone of the right port: [f/Hz, gain/dB]
    right_port = [(20, 2), (60, 0), (9000, 0), (12000, -8), (16000, -9)]
    right = irfft(rfft(dry[1]) * gain_of(read(right_port, np.fft.rfftfreq(N, 1 / SR))), N)
    ports = np.clip([dry[0], right], -1, 1)
    low_pass = signal.firwin(511, edge_hz, window=("kaiser", 9), fs=SR)
    return signal.oaconvolve(ports, low_pass[None], "same")


dry = scene()
out = record(dry)
generate_wav(out)
```